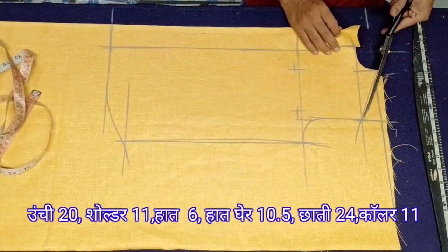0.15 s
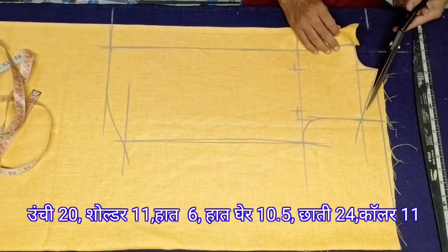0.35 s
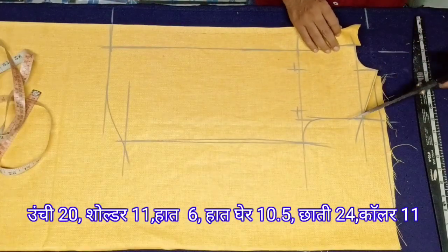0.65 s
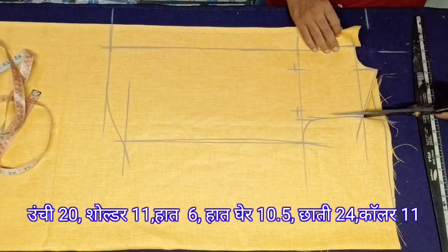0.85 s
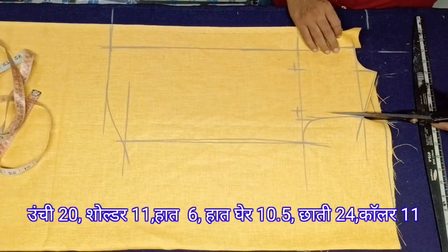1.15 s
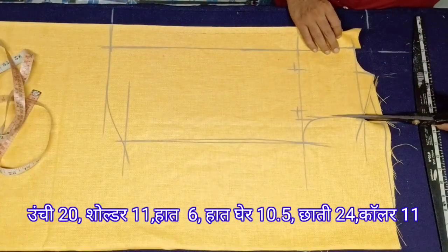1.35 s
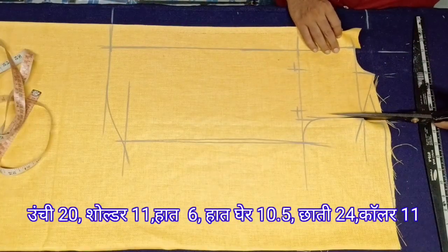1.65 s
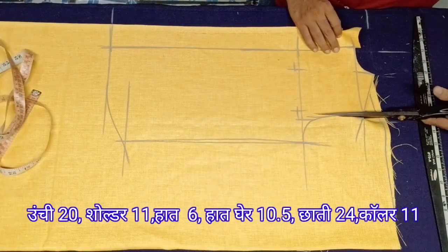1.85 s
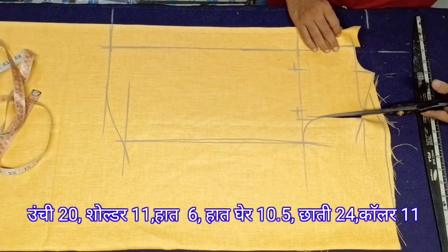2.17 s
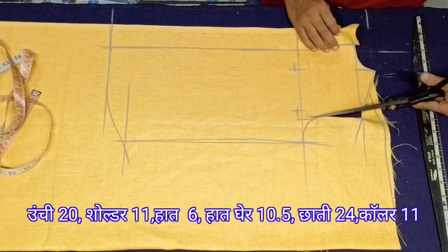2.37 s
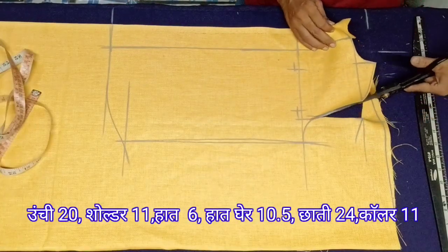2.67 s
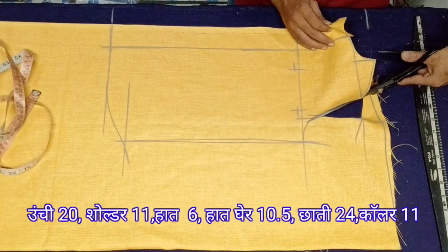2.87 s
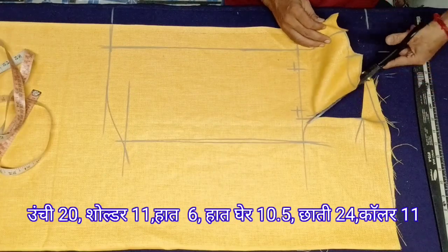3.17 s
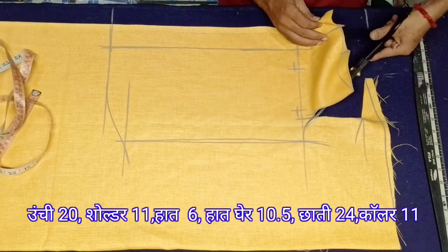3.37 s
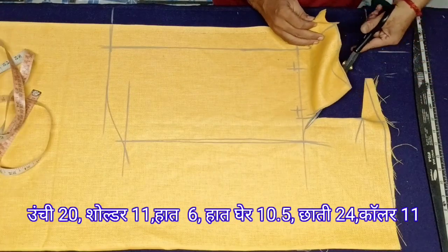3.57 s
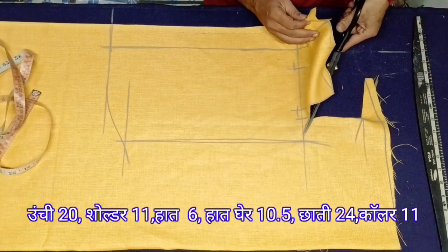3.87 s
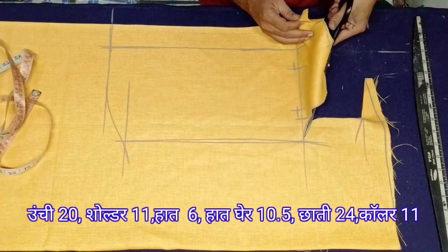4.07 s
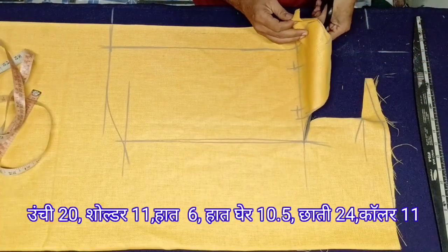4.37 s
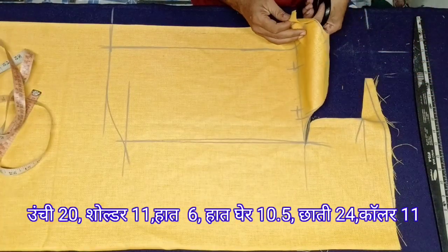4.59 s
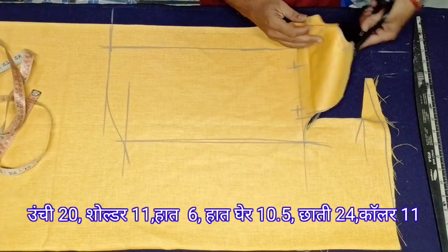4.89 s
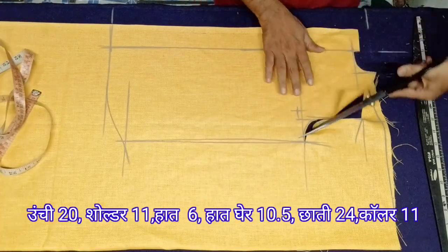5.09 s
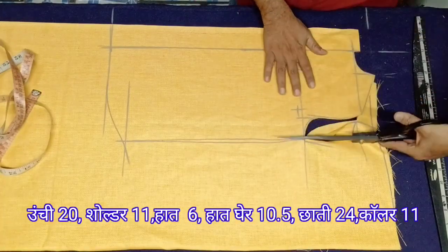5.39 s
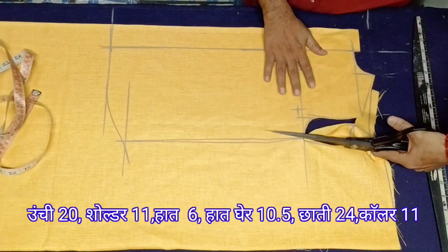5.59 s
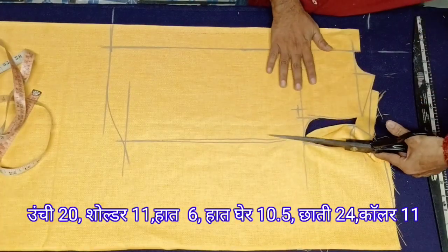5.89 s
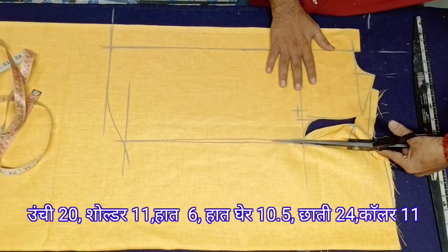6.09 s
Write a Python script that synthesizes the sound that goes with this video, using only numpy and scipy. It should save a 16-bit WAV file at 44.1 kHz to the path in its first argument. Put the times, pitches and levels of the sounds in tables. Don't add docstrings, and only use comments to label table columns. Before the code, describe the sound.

A quiet room with faint bass-heavy air, heard by a phone above a wooden table. Heavy shears finish a loud, crunchy cut in the first 0.13 seconds with a hard woody knock, then the blades open with a small metallic scrape at 0.3. A pause holds only a thin sliding hiss until 1.3, when a longer gritty cut builds to a crisp snap at 1.5 and the blades reopen. Shorter crunches follow around 2.0, 2.5, 3.0, 3.5 and 4.0, with cloth rustling, light ticks and low bumps and drags of the lower blade, busiest from 3.2 to 3.8. A firm, abrupt snip thumps the table at 4.47, and a slow soft opening follows near 4.7. It is nearly still from 4.9 to 5.8, with light touches, then two quick cuts crunch at 5.96 and 6.09, and a faint steely opening at 6.2.

```python
import sys
import numpy as np
from scipy import signal
from scipy.io import wavfile

SR = 44100
rng = np.random.default_rng(int(sys.argv[2]) if len(sys.argv) > 2 else 0)


def rack_gain(trim_db):
    fader = np.asarray(trim_db, float)
    return 10 ** (fader / 20)


def wav_out(sig):
    wavfile.write(sys.argv[1], SR, np.round(np.clip(np.atleast_2d(sig).T, -1, 1) * 32767).astype(np.int16))


N = 275184

# [f/Hz, level/dB, t60/s]
BOARD_MODES = [(57, -16.5, 0.17), (93, -17, 0.34), (110.7, -2, 0.22), (135, -3.5, 0.27), (162.5, 2.5, .22),
               (214, -7.5, .2), (255, -5, 0.22), (287.5, -11, 0.2), (310.3, 0, .15), (389, -4.5, 0.19),
               (530, -4.5, .1)]
# [f/Hz, level/dB, t60/s]
TABLE_MODES = [(310.6, -1.5, 0.099), (357.9, -4, 0.048), (393, -1.5, 0.14), (441, -8.5, 0.16),
               (533, -1.5, 0.048), (610, -2.5, 0.11), (665, -5, .1), (774, -5.5, 0.055),
               (855.3, -4.5, 0.078), (913, -6, .1), (981.5, -4, 0.077), (1076, -9.5, 0.07),
               (1189, -15.5, 0.05)]
# [f/Hz, level/dB, t60/s]
BLADE_MODES = [(2120, -4, 0.03), (2346, -1.5, 0.036), (2450, -3.5, .03), (2655, -1.5, 0.035),
               (2940, -9, 0.02), (3479, -2, 0.041), (3900, -1, 0.026), (4370, -4, 0.014),
               (4880, -4.5, 0.055), (5340, -0.5, 0.024), (5782, 1.5, .025), (6100, -3.5, 0.02),
               (6690, 2, .024), (7200, -1.5, 0.02)]
# [f/Hz, level/dB, t60/s]
EDGE_MODES = [(7750, 0, 0.0036), (8710, 1, 0.0099), (9800, 1.5, .008), (10670, 2.5, 0.0075),
              (11630, -2.5, 0.0031), (14700, -15, 0.0087)]


def unit(x):
    return x / np.sqrt(np.mean(x ** 2))


def undb(db):
    if np.ndim(db):
        return np.repeat(rack_gain(db[::8]), 8)[:len(db)]
    return rack_gain(db)


def curves(table):
    s, *columns = np.transpose(table)
    return [np.interp(np.arange(N) / SR, s, column) for column in columns]


def walk(rate):
    knots = np.clip(rng.standard_normal(int(N / SR * rate) + 2), -2, 2)
    return np.interp(np.arange(N) * rate / SR, np.arange(len(knots)), knots)


def add(track, s, x):
    i = int(s * SR)
    track[i:i + len(x)] += x[:N - i]


def threads(size, spread_db):
    strength_db = spread_db * np.minimum(rng.exponential(size=size), 4)
    return unit(rng.standard_normal(size) * rack_gain(strength_db))


def ring(x, hz, t60):
    r = np.exp(-np.log(1000) / (t60 * SR))
    angle = 2 * np.pi * hz / SR
    gain = np.sin(angle) * np.sqrt(4 * (1 - r))
    return signal.lfilter([gain], [1, -2 * r * np.cos(angle), r * r], x)


def body(x, modes, extra_db, flip=-1):
    out = 0
    for k, ((hz, db, t60), extra) in enumerate(zip(modes, extra_db)):
        out = out + flip ** k * ring(undb(db + extra) * x, hz, t60)
    return out / np.sqrt(sum(rack_gain(2 * db) for _, db, _ in modes))


def nearness(modes, pitch_hz, fall_db):
    return [11 - fall_db * np.minimum(np.abs(np.log2(hz / pitch_hz)), 1) for hz, _, _ in modes]


def rubbed(x, modes, patchy_db, rate):
    return body(x, modes, [patchy_db * walk(rate) for _ in modes])


def held(tugs, pitch_hz):
    damped = [(hz, db, 0.52 * t60) for hz, db, t60 in BOARD_MODES]
    return body(tugs, damped, nearness(BOARD_MODES, pitch_hz, fall_db=30)) * rack_gain(-7.5)


def steep(x, hz):
    return signal.sosfilt(signal.butter(4, hz, "lowpass", fs=SR, output="sos"), x)


def coloured(spectrum, patchy_db, rate, count):
    hz, db = np.transpose(spectrum)
    out, noise = 0, rng.standard_normal(N)
    octaves = np.arange(.5 / count, np.log2(hz[-1] / hz[0]), 1 / count)
    for k, f in enumerate(hz[0] * 2 ** octaves):
        limits = [f * 2 ** (-.5 / count), f * 2 ** (.5 / count)]
        sos = signal.butter(2, limits, "bandpass", fs=SR, output="sos")
        swing = walk(rate)
        swing_db = patchy_db * (swing + 2.3 * np.minimum(swing, 0))
        gain = undb(np.interp(np.log(f), np.log(hz), db) + swing_db)
        out = out + signal.sosfilt(sos, np.roll(noise, k * 5000)) * gain
    return unit(out)


def narrow(hz, width_hz, size):
    sos = signal.butter(2, width_hz / 2, fs=SR, output="sos")
    warm = size + SR // 10
    noise = rng.standard_normal(warm) + 1j * rng.standard_normal(warm)
    tumble = signal.sosfilt(sos, noise)[-size:]
    carrier = np.exp(2j * np.pi * np.cumsum(hz * np.ones(size)) / SR)
    return unit((tumble * carrier).real)


def room_noise():
    # [f/Hz, level/dB per Hz]
    air = [(18, -35.5), (30, -10), (77, 9), (332, 0), (399, -6), (491, -13), (896, -16), (1430, -19),
           (1720, -26), (2360, -25), (15500, -34.5)]
    return coloured(air, patchy_db=.5, rate=7.3, count=2) * rack_gain(-77.5 + 2.8)


def force(rows, ring_fall_db):
    out = np.zeros((3, N))
    for start, full, end, db, ring_db in rows:
        t = np.arange(max(start, 0), end, 1 / SR)
        past = np.maximum(t - full, 0) / (end - full)
        rise = np.clip((t - start) / (full - start), 0, 1)
        wood = rise ** .7 * np.clip((end - t) / .012, 0, 1) * rack_gain(db - 18 * past)
        steel = wood * rise ** .6 * rack_gain(ring_db - ring_fall_db * past)
        share = (t - start) / (end - start)
        press = rack_gain(db) * np.exp(-((share - .65) / .2) ** 2)
        for track, push in zip(out, (wood, steel, press)):
            add(track, t[0], push)
    return out


def strokes():
    # [start t/s, fullest t/s, end t/s, table level/dB, ring minus table/dB]
    closing_rows = [(-.15, .1, .135, -36, -12), (1.32, 1.51, 1.6, -35, -19), (1.925, 1.952, 2.13, -41, -23),
                    (2.38, 2.538, 2.6, -43, -14), (2.89, 3.032, 3.09, -42, -10),
                    (3.42, 3.556, 3.6, -44, -8), (3.92, 4.034, 4.14, -42, -16),
                    (4.43, 4.47, 4.535, -33, -10), (5.8, 5.834, 5.94, -77, 3),
                    (5.948, 5.965, 6.05, -40, -13), (5.99, 6.1, 6.17, -41, -11)]
    opening_rows = [
        (.278, .302, .42, -50.5, 3),
        (1.642, 1.67, 1.78, -45, -8),
        (4.62, 4.74, 4.8, -50, -10),
        (6.197, 6.21, 6.4, -59, 12),
    ]
    closing, opening = force(closing_rows, ring_fall_db=5), force(opening_rows, ring_fall_db=19)
    wood, steel, _ = closing + opening
    edge = closing[1] * rack_gain(-14) + opening[1] * rack_gain(-33)

    snaps = threads(N, spread_db=3.0) * rack_gain(4.7 * walk(110))
    table = rubbed(snaps * wood * rack_gain(-6), TABLE_MODES, patchy_db=3, rate=14)
    blades = rubbed(snaps * steel * rack_gain(-9), BLADE_MODES, patchy_db=4.5, rate=14)
    sizzle = rubbed(snaps * edge * rack_gain(-7), EDGE_MODES, patchy_db=4.5, rate=20)
    board = held(snaps * closing[2] * rack_gain(-2.5), pitch_hz=170)
    return steep(table, 1400) + steep(blades, 7900) + board + steep(sizzle, 13300)


def bites():
    # [t/s, peak level/dB, crispness/dB, table pitch f/Hz]
    bunches = [(.015, -38, -5.5, 565), (.058, -19.5, -14, 523), (.096, -22.5, -21, 390),
               (1.342, -36, -22, 608), (1.368, -28, -21.5, 480), (1.437, -26, -19.5, 530),
               (1.483, -27, -14.5, 625), (1.508, -22.5, -12, 393), (1.941, -28, -31, 637),
               (1.99, -28.5, -18.5, 650), (2.023, -24, -17, 854), (2.057, -35.5, -5.5, 657),
               (2.441, -37.5, -7, 790), (2.465, -28.5, -12.5, 710), (2.524, -24.5, -12, 480),
               (2.932, -35.5, -12, 590), (3.001, -34, -6.5, 400), (3.031, -34, -11.5, 587),
               (3.416, -38.5, -15.5, 780), (3.454, -37.5, -5.5, 673), (3.508, -34, -5.5, 385),
               (3.537, -37.5, 1, 375), (3.986, -28, -10, 600), (4.03, -24, -11.5, 650),
               (4.446, -24.5, -14, 540), (4.468, -25, -11, 330), (5.956, -29, -14, 630),
               (5.996, -34, -22, 900), (6.039, -28.5, -12.5, 670), (6.084, -29, -7, 620)]
    more_bites = [(.288, -44, 6, 820), (1.649, -38, -15, 425), (2.205, -40, -29, 565), (3.68, -39, -35, 806),
                  (4.112, -36, -35, 730), (4.382, -40, -17, 630), (4.708, -47, 2, 820), (6.207, -54, 5, 610),
                  (.016, -33, -15, 550), (.296, -43, -20, 900), (1.384, -33, -20, 400), (2.262, -43, -35, 780),
                  (2.335, -43, -30, 760), (2.4, -45, -25, 400), (2.678, -42, -20, 600), (2.71, -41, -20, 950),
                  (2.945, -33, -15, 900), (3.196, -42, -20, 310), (3.39, -43, -25, 790), (3.8, -45, -35, 850),
                  (3.903, -43, -25, 650), (3.945, -40, -25, 900), (4.168, -37, -25, 650), (4.2, -44, -25, 980),
                  (4.32, -46, -20, 800), (4.488, -28, -20, 310), (4.62, -45, -25, 310), (6.107, -36, -10, 620)]
    out, t = np.zeros(N), np.arange(SR // 5) / SR
    for s, db, bright_db, pitch_hz in bunches + more_bites:
        length = max(.009 - .00025 * bright_db, 1e-3)
        shape = np.minimum(t / 0.0025, 1) * np.exp(-t / (0.87 * length))
        jolt = threads(len(t), spread_db=4.5) * shape
        table = body(jolt, TABLE_MODES, nearness(TABLE_MODES, pitch_hz, fall_db=17))
        add(out, max(s - .005, 0), 1.315 * table / np.abs(table).max() * rack_gain(db - 4.5))
    return steep(out, 1350)


def drag():
    # [centre t/s, length t/s, level/dB]
    thrums = [(.15, .25, -52), (.55, .3, -74), (1.13, .15, -72), (1.86, .1, -72), (2.87, .1, -64),
              (4.38, .1, -64), (1.52, .24, -47), (2.05, .25, -55), (2.62, .35, -50), (3.01, .2, -56),
              (3.27, .17, -53), (3.55, .15, -54), (3.83, .2, -52), (4.12, .12, -70), (4.6, .2, -59),
              (4.88, .2, -62), (5.05, .2, -60), (5.3, .25, -61), (5.68, .22, -58), (5.92, .07, -56)]
    # [start t/s, length t/s, level/dB, board pitch f/Hz]
    slides = [(1.65, .16, -57, 300), (2.05, .12, -55, 250), (2.6, .18, -53, 120), (2.66, .1, -55, 400),
              (2.74, .16, -50, 230), (2.83, .12, -43, 170), (3.07, .1, -53, 130), (3.16, .15, -54, 280),
              (3.22, .23, -49, 135), (3.49, .27, -47, 150), (3.76, .14, -51, 135), (3.89, .29, -53, 160),
              (4.07, .3, -54, 300), (4.33, .12, -52, 130), (4.54, .14, -50, 160), (4.5, .14, -51, 310),
              (4.68, .1, -64, 280), (4.78, 1.05, -71, 130)]
    swell, out = np.zeros(N), np.zeros(N)
    for s, length, db in thrums:
        arch = np.sin(np.pi * np.arange(0, 1, 1 / (length * SR)))
        add(swell, s - length / 2, rack_gain(db) * arch)
    tugs = threads(N, spread_db=5.0) * rack_gain(3.8 * walk(29.95))
    for s, length, db, pitch_hz in slides:
        size = int(length * SR)
        push = tugs[int(s * SR):][:size] * signal.windows.tukey(size, .4) * rack_gain(db)
        add(out, s, held(np.pad(push, (0, SR // 5)), pitch_hz))
    frame_hz = 57.5 + 6.5 * walk(rate=24)
    hum = np.sqrt(2) * np.sin(2 * np.pi * np.cumsum(frame_hz) / SR)
    return out + hum * swell * rack_gain(3.5 * walk(rate=22))


def rings():
    # [centre t/s, length t/s, level/dB, strongest blade pitch f/Hz, edge sizzle minus ring/dB]
    swells = [(0.034, 0.027, -50.3, 3900.0, -20.1), (0.068, 0.022, -43.3, 2300.0, -17.0),
              (0.1, 0.014, -47.7, 6700.0, -13.2), (0.296, 0.015, -45.1, 2300.0, -27.6),
              (1.36, 0.035, -61.0, 6100.0, -8.0), (1.4, 0.045, -59.0, 4900.0, -9.0),
              (1.446, 0.023, -54.9, 3500.0, -15.2), (1.486, 0.019, -50.8, 5400.0, -14.7),
              (1.519, 0.014, -42.5, 6700.0, -13.9), (1.668, 0.023, -56.1, 5900.0, -22.7),
              (1.95, 0.019, -64.0, 2300.0, -14.4), (1.997, 0.015, -55.1, 2300.0, -26.3),
              (2.018, 0.012, -52.0, 7000.0, -24.0), (2.038, 0.015, -48.3, 3900.0, -18.7),
              (2.066, 0.014, -48.9, 5400.0, -15.6), (2.415, 0.02, -63.0, 3600.0, -18.0),
              (2.454, 0.032, -55.3, 3500.0, -20.1), (2.47, 0.019, -51.4, 3900.0, -15.5),
              (2.53, 0.014, -44.4, 2300.0, -15.8), (2.945, 0.025, -52.0, 3900.0, -18.2),
              (3.009, 0.013, -47.8, 5400.0, -17.4), (3.036, 0.018, -50.0, 5400.0, -14.2),
              (3.432, 0.03, -54.1, 3500.0, -23.8), (3.46, 0.019, -52.2, 3900.0, -20.5),
              (3.515, 0.013, -49.3, 4800.0, -9.9), (3.543, 0.032, -49.5, 4800.0, -13.8),
              (3.953, 0.02, -56.6, 3500.0, -24.2), (3.989, 0.013, -48.7, 6700.0, -20.0),
              (4.036, 0.019, -45.3, 2700.0, -14.7), (4.399, 0.009, -55.8, 3900.0, -31.3),
              (4.455, 0.016, -44.6, 2700.0, -17.9), (4.476, 0.021, -45.1, 6700.0, -12.8),
              (4.716, 0.017, -52.1, 5400.0, -24.1), (5.873, 0.014, -68.0, 6600.0, -14.0),
              (5.942, 0.014, -63.0, 6900.0, -12.0), (5.963, 0.021, -52.9, 6700.0, -14.5),
              (6.007, 0.029, -55.0, 2300.0, -17.2), (6.046, 0.014, -46.6, 6700.0, -22.2),
              (6.091, 0.012, -41.6, 2300.0, -14.3), (6.219, 0.027, -49.1, 5400.0, -17.4)]
    out, t = np.zeros(N), np.arange(SR // 8) / SR
    for s, length, db, pitch_hz, edge_db in swells:
        shape = np.exp(-((t - .04) / (.52 * max(length, .004))) ** 2)
        snaps = threads(len(t), spread_db=3.0) * shape
        scatter_db = 4.5 * rng.standard_normal(len(BLADE_MODES))
        reach_db = scatter_db + nearness(BLADE_MODES, pitch_hz, fall_db=7)
        steel = steep(body(snaps, BLADE_MODES, reach_db), 7900)
        edge = steep(body(snaps, EDGE_MODES, scatter_db[::-1]), 13300)
        mix = steel / np.linalg.norm(steel) + edge / np.linalg.norm(edge) * rack_gain(edge_db + 1.2)
        sound = np.sqrt(np.sum(shape ** 2)) * mix * rack_gain(db - 1.2)
        start = s - .042
        add(out, max(start, 0), sound[int(max(-start, 0) * SR):])
    return out


def knocks():
    # [t/s, peak level/dB, board pitch f/Hz, contact t/s]
    hits = [(0.101, -16, 185, 0.0024), (1.513, -31, 390, 0.0031), (2.033, -33.5, 377, 0.0022),
            (2.52, -41, 318, 0.0055), (3.026, -36, 212, 0.0034), (3.242, -40.5, 126, 0.0041),
            (3.274, -37.5, 120, 0.0048), (3.314, -39, 127, 0.0047), (3.349, -46, 129, 0.0054),
            (3.385, -41, 137, 0.0043), (3.535, -38, 156, 0.0041), (3.574, -34, 147, 0.0059),
            (3.644, -48, 129, 0.0047), (3.684, -38.5, 155, 0.0033), (3.723, -50.5, 171, 0.0035),
            (3.783, -39.5, 138, 0.0071), (3.823, -54, 145, 0.0046), (4.033, -30, 374, 0.0023),
            (4.486, -26, 167, 0.0035), (4.504, -27.5, 161, 0.0018), (6.095, -36.5, 163, 0.0019)]
    out, t = np.zeros(N), np.arange(SR // 3) / SR
    for s, db, pitch_hz, contact in hits:
        push = np.sin(np.pi * np.minimum(t / max(contact, 5e-4), 1)) ** 2
        scatter_db = 2.2 * rng.standard_normal(len(BOARD_MODES))
        reach_db = np.add(nearness(BOARD_MODES, pitch_hz, fall_db=9), scatter_db)
        thud = body(np.gradient(push), BOARD_MODES, reach_db, flip=0.92)
        add(out, s, thud / np.abs(thud).max() * rack_gain(db + .3))
    return out


def touches():
    # [t/s, length t/s, f/Hz, level/dB]
    contacts = [(0.191, 0.032, 2410, -78), (0.418, 0.087, 5760, -85.5), (.55, 0.092, 317, -65),
                (0.553, .08, 5500, -80), (0.607, .1, 610, -68.5), (0.615, 0.057, 3500, -87),
                (1.109, 0.075, 2100, -81), (1.31, 0.017, 9900, -66), (1.54, 0.2, 2530, -67),
                (1.335, .11, 10500, -68), (1.335, .09, 5900, -67), (1.38, .09, 3500, -65),
                (4.75, .2, 4600, -80), (1.65, 0.04, 10000, -79), (3.168, 0.042, 2700, -68),
                (3.17, 0.046, 10300, -85), (3.693, 0.037, 10400, -83), (4.924, 0.26, 990, -70),
                (5.814, .07, 320, -62.5), (5.868, 0.08, 615, -67.5), (5.959, 0.058, 1535, -56),
                (0.285, 0.082, 1770, -65), (6.08, 0.025, 14700, -72), (5.815, 0.05, 6100, -76),
                (5.85, 0.04, 7100, -74), (2.2, .18, 135, -57), (1.365, 0.12, 153, -48),
                (4.75, 0.54, 255, -73), (1.335, .125, 11300, -69), (1.34, .08, 7200, -70),
                (1.37, .09, 14600, -87), (1.65, .06, 5800, -64), (1.73, .035, 5900, -75),
                (1.93, .05, 10800, -76), (1.935, .03, 6400, -68), (2.085, .045, 8700, -81),
                (3.41, .06, 3700, -60), (3.42, .08, 7000, -69), (3.22, .12, 5700, -70),
                (4.7, .05, 2400, -60), (4.465, .03, 14500, -72), (5.945, .08, 10900, -70),
                (5.985, .04, 14900, -83), (5.817, .02, 9800, -80), (5.86, .03, 9800, -80),
                (.31, .11, 5700, -70), (.28, .03, 6700, -60), (2.68, .05, 7000, -76), (1.65, .11, 380, -53),
                (1.735, .02, 1450, -64), (6.0, .04, 2350, -58)]
    out, tremor = np.zeros(N), rack_gain(3.0 * walk(rate=140))
    for s, length, hz, db in contacts:
        size = int(length * SR)
        band = narrow(hz, width_hz=30 + 0.03 * hz, size=size)
        add(out, s, band * np.hanning(size) ** 0.4 * rack_gain(db))
    return out * tremor


def hiss():
    # [t/s, level/dB, centre f/Hz]
    glides = [
        [(0.36, -90, 1477), (0.502, -74.5, 1402), (0.736, -64, 1468), (1.07, -89, 1430)],
        [(1.08, -83, 1410), (1.34, -61, 1550), (1.46, -60, 1600), (1.6, -67, 1200), (1.75, -76, 1150),
         (1.86, -70, 1050), (1.9, -80, 1190)],
        [(3.2, -78, 1400), (3.5, -65, 1450), (3.7, -69, 1600), (3.95, -78, 1700)],
        [(5.3, -97, 1458), (5.418, -76, 1483), (5.456, -82, 1440), (5.85, -82.5, 1360)],
    ]
    out = np.zeros(N)
    for rows in glides:
        s, db, hz = np.transpose(rows)
        t = np.arange(s[0], s[-1], 1 / SR)
        centre_hz = np.interp(t, s, hz)
        core = narrow(centre_hz, width_hz=76, size=len(t))
        skirt = narrow(centre_hz, width_hz=250, size=len(t))
        level = rack_gain(np.interp(t, s, db) + 5.0) * signal.windows.tukey(len(t), .1)
        add(out, s[0], (core + rack_gain(-3) * skirt) * level)
    return out


def cloth():
    # [t/s, rustle level/dB, weight on the table/dB, contact pitch f/Hz]
    handling = [(1.3, -91, 8, 480), (1.5, -68, 8, 450), (1.62, -72, 6, 400), (1.88, -79, 8, 1000),
                (2.1, -66.5, 0, 800), (2.3, -65, 10, 700), (2.62, -63, 0, 800), (2.71, -63, 10, 480),
                (2.8, -65, 6, 950), (3.13, -68, 6, 850), (3.2, -64, 8, 750), (3.4, -62, 5, 800),
                (3.9, -63, 7, 750), (4.15, -65, 13, 720), (4.6, -66, 4, 700), (4.85, -78, 0, 900),
                (5.8, -85, 2, 950), (6.12, -74, 3, 700)]
    # [f/Hz, level/dB per Hz]
    fabric = [(650, -21.5), (1100, -6.5), (1350, 2), (1540, -7.5), (1880, -4), (2170, -11), (3970, -12.5),
              (6100, -19), (7250, -43), (9000, -39.5), (11700, -65.5), (19800, -120)]
    rustle_db, weight_db, pitch_hz = curves(handling)
    near_db = nearness(TABLE_MODES, pitch_hz, fall_db=27)
    grip_db = [db + rustle_db + weight_db + 3.5 * walk(rate=12) for db in near_db]
    brush = body(threads(N, spread_db=1.5), TABLE_MODES, grip_db) * rack_gain(-4)
    crinkle_db = rustle_db + 1.8 * walk(rate=25)
    crinkle = coloured(fabric[1:-2], patchy_db=3.3, rate=12, count=12)
    return brush + crinkle * rack_gain(crinkle_db + 3.5)


def room_tail(near):
    t = np.arange(SR // 4) / SR
    tail = rng.standard_normal(len(t)) * rack_gain(-60 * t / 0.13) * np.minimum(t / 0.012, 1)
    return signal.fftconvolve(near, tail / np.sqrt(np.sum(tail ** 2)))[:N] * rack_gain(-11)


def scene():
    near = strokes() + bites() + rings() + knocks()
    soft = touches() + drag() + cloth() + hiss()
    return (near + room_tail(near) + soft + room_noise())[None]


def roll_off(x):
    return signal.sosfilt(signal.butter(12, 15610, fs=SR, output="sos"), x)


def record(dry):
    mix = signal.sosfilt(signal.butter(4, 45, "highpass", fs=SR, output="sos"), dry)
    return roll_off(mix)


dry = scene()
out = record(dry)
wav_out(out)
```